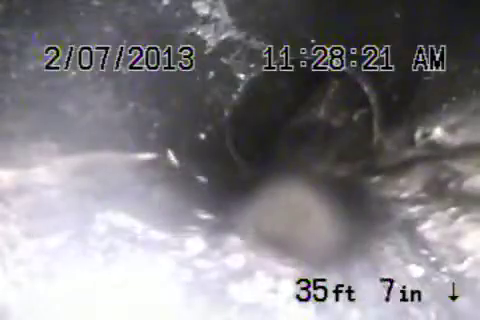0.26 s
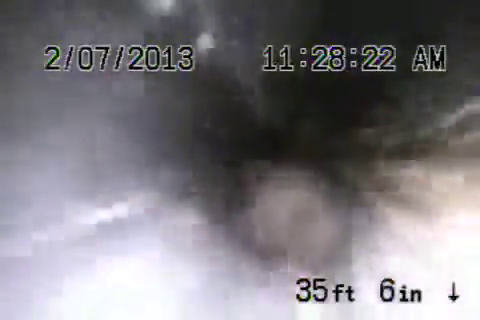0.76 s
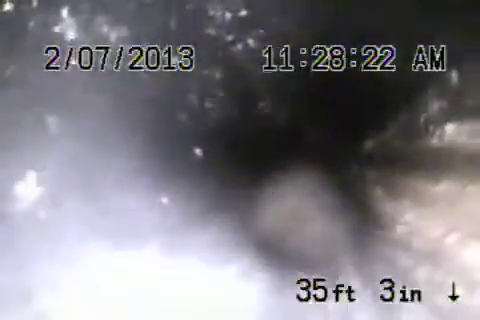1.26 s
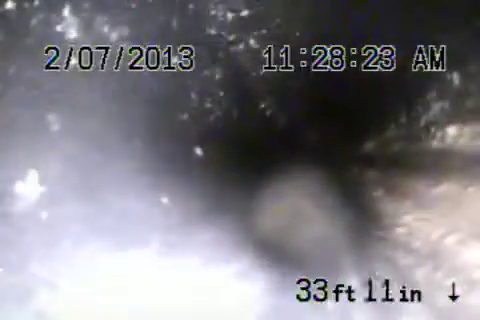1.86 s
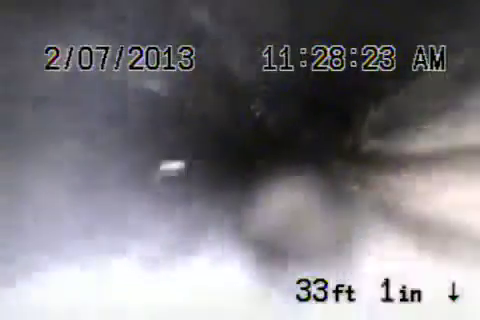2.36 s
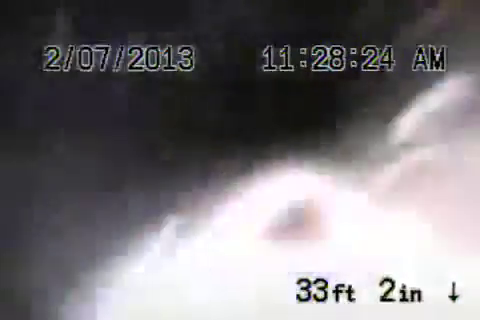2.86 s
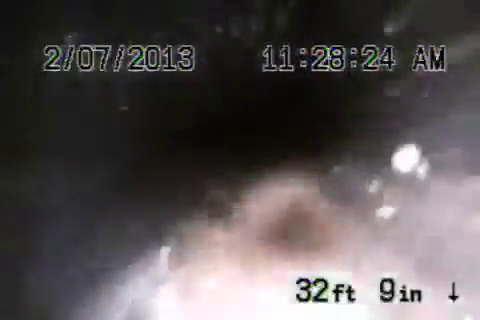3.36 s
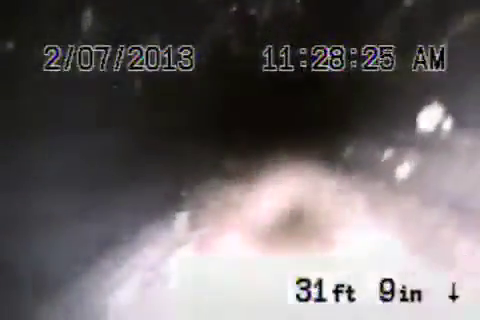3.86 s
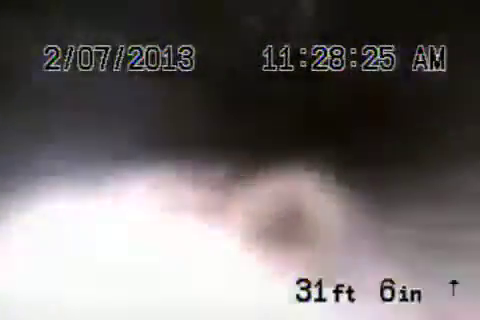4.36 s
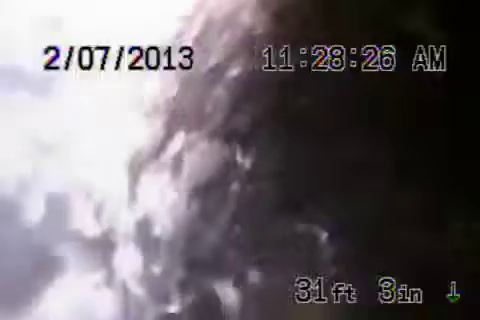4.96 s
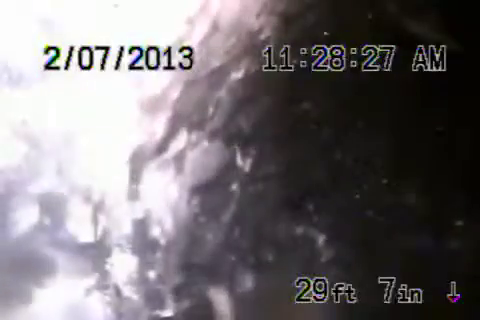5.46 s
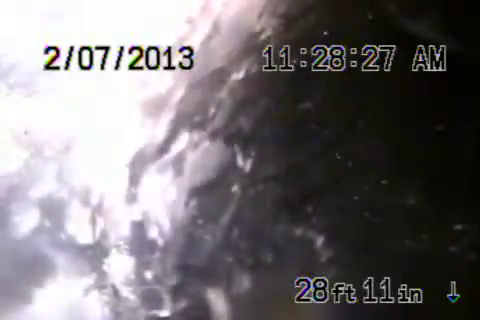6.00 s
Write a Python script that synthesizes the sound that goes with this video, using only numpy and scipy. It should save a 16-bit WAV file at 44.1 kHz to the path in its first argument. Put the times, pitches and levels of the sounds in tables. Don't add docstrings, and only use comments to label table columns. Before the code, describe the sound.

Dull thuds and rattling knocks of a cable being pulled from a pipe, with light taps, a steady low hum and soft preamp hiss.

```python
import sys
import numpy as np
from scipy import signal
from scipy.fft import rfft, irfft
from scipy.io import wavfile
from scipy.ndimage import uniform_filter1d

SR = 44100
rng = np.random.default_rng(int(sys.argv[2]) if len(sys.argv) > 2 else 0)


def gain_from_db(level_db):
    decades = np.asarray(level_db, float) / 20
    return 10 ** decades


def transcribe(u):
    v = np.clip(np.atleast_2d(u).T, -1, 1)
    q = np.round(v * 32767).astype(np.int16)
    wavfile.write(sys.argv[1], SR, q)


N = 274872

# frequency in Hz, level in dB, t60 in s.
BODY_MODES = [(219, 1, .16), (328, 4, .2), (350, -3, .14), (412, 2, .16), (470, -2, .14), (530, -1, .14),
              (568, -2, .15), (597, 0, .18), (646, -3, .15), (724, -4, .14), (850, -13, .1),
              (940, -16, .09), (1061, -15, .09), (1246, -13, .08), (1384, -10, .08), (1603, -5, .09),
              (1789, -4, .08)]


def evened(x):
    return x / np.sqrt(np.mean(x ** 2) + 1e-20)


def read(points, hz):
    f, value = np.transpose(points)
    return np.interp(np.log(hz + 1), np.log(f + 1), value)


def add(mix, s, sound):
    part = mix[round(s * SR):][:len(sound)]
    part += sound[:len(part)]


def ring(x, hz, width):
    pole = np.exp((2j * np.pi * hz - np.pi * width) / SR)
    return 2 * signal.lfilter([1 - abs(pole)], [1, -pole], x).real


def colour(x, spectrum):
    n = x.shape[-1]
    gain = gain_from_db(read(spectrum, np.fft.rfftfreq(n, 1 / SR)))
    return irfft(rfft(x) * gain, n)


def blow(t, rise, t60):
    rise, t60 = max(rise, .001), max(t60, .02)
    return np.minimum(t / rise, 1) * gain_from_db(-60 * np.maximum(t - rise, 0) / t60)


def grit(shape, spread_db):
    wander = uniform_filter1d(rng.standard_normal(shape), size=88) * np.sqrt(88)
    impacts = gain_from_db(spread_db * wander) * rng.standard_normal(shape)
    return signal.sosfilt(signal.butter(3, 1100, fs=SR, output="sos"), impacts)


def strokes(rows, rise_db_s, rest_db):
    t = np.arange(0, N / SR + .002, .001)
    power = gain_from_db(2 * rest_db)
    for s, db, t60 in rows:
        below_top = np.where(t < s, rise_db_s * (s - t), 60 * (t - s) / max(t60, .1))
        power = power + gain_from_db(2 * (db - below_top))
    return np.interp(np.arange(N) / SR, t, np.sqrt(power))


def floor():
    # frequency in Hz, density in dB per Hz.
    floor_spectrum = [(28, -24), (48, -5.5), (154, -4), (187, -11), (232, -21.5), (342, -30.5),
                      (530, -27.5), (598, -26), (881, -41), (1740, -36), (2220, -39), (2760, -40.5),
                      (7820, -41.5), (10700, -40), (15800, -44.5)]
    # centre in Hz, width in Hz, level in dB.
    whine_band = (2280, 480, -68.5)
    hiss = colour(rng.standard_normal(N), floor_spectrum)
    top = signal.sosfilt(signal.butter(4, 3000, "high", fs=SR, output="sos"), hiss)
    hz, width, whine_db = whine_band
    whine = evened(ring(ring(rng.standard_normal(N), hz, width), hz, width))
    flicker_db = evened(uniform_filter1d(rng.standard_normal(N), size=1200))
    cycle = np.arange(N) / SR * 29.97 % 1
    unsteady = gain_from_db(flicker_db + 3 * np.exp(-cycle / .1))
    return unsteady * (gain_from_db(-58.5) * hiss / np.std(top) + gain_from_db(whine_db) * whine)


def hum():
    # frequency in Hz, width in Hz, level in dB.
    room_modes = [(65.2, 4.8, 3.5), (117.9, 12.5, 4), (146, 19, -8), (167, 8.5, -5.5), (183.5, 17, -14.5)]
    # time of the top in s, level in dB, t60 in s.
    swells = [(0.01, -40, 1.7), (.45, -30.5, 3.2), (1.36, -36, 8.1), (2.2, -32, 6), (2.62, -33.5, 7.2),
              (4.3, -30.5, 2.3), (5.1, -32, 2.4), (5.85, -35, 4.2)]
    noise = rng.standard_normal((len(room_modes), N))
    tone = np.zeros(N)
    for x, (hz, width, db) in zip(noise, room_modes):
        narrow = ring(ring(x, hz, width), hz, 6.8 * width)
        tone += gain_from_db(db) * evened(narrow)
    return gain_from_db(-1.43) * strokes(swells, rise_db_s=39, rest_db=-44) * evened(tone)


def pushes():
    # time after the start in s, pressure, width in s.
    yank_lobes = [(-.1, .04, .06), (0, -.4, .022), (.037, .3, .014), (.09, .52, .017), (.15, -.11, .035),
                  (.232, .08, .016), (.27, -.07, .025)]
    recoil_lobes = [(-.08, .13, .04), (-.035, .17, .016), (0, -.3, .014), (.047, -.29, .017),
                    (.105, .17, .018), (.146, .06, .012), (.228, .06, .014), (.27, .05, .012),
                    (.3, -.05, .014)]
    slack_lobes = [(-.2, 0.033, 0.029), (-.09, -0.051, 0.067), (0, 0.087, 0.042), (.05, 0.051, 0.03),
                   (.105, -.08, .025), (.255, -0.038, 0.019)]
    # start in s, strength.
    yank_plays = [
        (.148, .79),
        (2.045, 1.01),
    ]
    recoil_plays = [
        (.588, .85),
        (2.501, 1.01),
        (4.354, .66),
    ]
    slack_plays = [
        (3.924, 1.01),
        (6.24, .6),
    ]
    t = np.arange(N) / SR
    sway_spectrum = [(3, -20), (8, -4), (16, 0), (23, 0), (28, -16), (45, -60)]  # (Hz, dB)
    out = gain_from_db(-38) * evened(colour(rng.standard_normal(N), sway_spectrum))
    gestures = ((yank_lobes, yank_plays), (recoil_lobes, recoil_plays), (slack_lobes, slack_plays))
    for lobes, plays in gestures:
        for s, strength in plays:
            for at, pressure, width in lobes:
                out += strength * pressure * np.exp(-((t - s - at) / width) ** 2)
    return out


def drag():
    # time of the top in s, level in dB, t60 in s.
    slides = [(0.01, -50.5, 1.2), (.375, -15.5, 0.34), (.56, -40.5, 8.8), (1.1, -50, 0.76),
              (1.54, -39, 0.85), (1.94, -38, 1.2), (2.19, -36, 4), (2.415, -26, 1.24), (2.92, -40.5, 3.7),
              (3.12, -37.5, 0.71), (3.4, -52, 2.5), (4.3, -44, 4.3), (4.41, -39.5, 2), (4.85, -44.5, 5.9),
              (5.1, -48.5, 1.3), (5.5, -57, 6)]
    rub = grit(N, spread_db=2.5)
    murmur = sum(gain_from_db(db) * ring(rub, hz, 4 / t60) for hz, db, t60 in BODY_MODES[:13])
    return gain_from_db(-8.0) * strokes(slides, rise_db_s=700, rest_db=-71.5) * evened(murmur)


def clunks():
    # frequency in Hz, rise in s.
    housing_modes = [
        (69, 0.026),
        (113.5, 0.018),
        (148, 0.0077),
    ]
    # start in s, peak in dB, t60 in s.
    thuds = [
        [(0.358, -27, 0.25), (1.394, -27, 0.34), (2.119, -30.5, .32), (2.424, -20, 0.2), (3.399, -36, 0.43),
         (4.048, -34.5, 0.3), (4.309, -27.5, 0.63), (5.048, -35, .4), (5.858, -25.5, 0.48),
         (6.118, -29.5, 0.46)],
        [(0.355, -20, 0.22), (0.59, -25, 0.33), (1.036, -28.5, 0.88), (1.394, -26.5, .52), (1.563, -24.5, 0.22),
         (2.113, -24, 0.22), (2.39, -24.5, .51), (2.605, -34, 0.16), (2.772, -32, 0.59), (2.96, -25, 0.68),
         (3.19, -35, 0.47), (4.19, -27, 0.44), (5.04, -21.5, 0.22), (5.0575, -16.5, 0.22), (5.787, -22, 0.23)],
        [(0.357, -15.5, 0.47), (0.48, -30.5, 0.45), (2.123, -22, 0.29), (2.389, -21, 0.15), (2.47, -21.5, 0.23),
         (2.603, -30.5, 0.23), (3.068, -28.5, 0.74), (3.2, -23.5, 0.4), (4.185, -22.5, 0.57),
         (4.317, -28, 0.21), (5.125, -36, .38)],
    ]
    t, out = np.arange(SR // 2) / SR, np.zeros(N)
    for (hz, rise), rows in zip(housing_modes, thuds):
        for s, db, t60 in rows:
            noise = rng.standard_normal(len(t))
            wobble = 0.22 * evened(ring(noise, hz, 14.5))
            tone = np.sin(2 * np.pi * hz * t) + wobble
            add(out, s, gain_from_db(db - 1.5) * tone * blow(t, rise, t60))
    return out


def hits():
    knock_rises = [
        0.0058,
        0.0091,
        0.017,
    ]
    # start in s, peak in dB, bright clatter in dB,
    # centre of the ring in octaves above 250 Hz, rattle t60 in s.
    hard_knocks = [
        [(1.029, -32, -49, 1.2, 0.25), (1.481, -32, -57, 1.4, 0.23), (3.063, -25, -39, 1.74, 0.088),
         (4.178, -20.5, -34, 0.97, 0.34)],
        [(0.35, -13.5, -24.5, 0.67, 0.28), (1.872, -34.5, -56.5, 1.17, 0.69), (2.094, -20.5, -34.5, 1.27, 0.3),
         (2.469, -28.5, -39, 1.3, 0.47)],
        [(2.384, -18.5, -27, 1.62, 0.4), (2.569, -30, -42, 1.13, 0.21), (3.273, -38, -51, 1.5, 0.18),
         (5.03, -27, -49, 1.24, 0.49), (5.056, -23.5, -32, 0.59, 0.28), (5.781, -33, -44.5, 0.87, 0.27)],
    ]
    # start in s, peak in dB, centre of the ring in octaves above 250 Hz.
    light_taps = [(0.116, -53, 1.6), (0.548, -33, 0.78), (0.838, -48, 0.97), (0.867, -42.5, 0.98),
                  (0.985, -46, 1.4), (1.198, -44, 0.47), (1.395, -44, 0.26), (1.638, -40, 0.36),
                  (1.762, -48, 0.67), (1.914, -37, 1.5), (2.23, -31.5, 0.82), (2.322, -33, 1.3),
                  (2.665, -44, 0.24), (2.783, -42, 0.73), (2.926, -41, 1.2), (3.096, -34.5, 1.1),
                  (3.907, -49, 2.3), (4.299, -39, 0.61), (4.494, -40, 0.98), (4.539, -47.5, 2.2),
                  (4.72, -40, 0.67), (4.802, -40, 0.22), (5.199, -46, 0.27), (5.579, -50, 1.5)]
    found = []
    for rise, rows in zip(knock_rises, hard_knocks):
        for s, db, bright_db, place, t60 in rows:
            found.append((s, db, bright_db, place, rise, t60))
    for s, db, place in light_taps:
        bright_db = -53 + 0.38 * (db + 36)
        found.append((s, db, bright_db, place, .011, 0.22))
    return found


def clatter(noise, t60, tilt_db):
    # frequency in Hz, clatter t60 as a factor on the rattle's.
    fade_factors = [(700, 1.32), (2000, 0.94), (4000, 0.77), (8000, 0.36)]
    hz, t, z = signal.stft(noise, SR, nperseg=128)
    tilt = tilt_db * np.log2(np.maximum(hz, 700) / 1600)
    band_t60 = max(t60, .03) * read(fade_factors, hz)
    z = z * gain_from_db(tilt[:, None] - 60 * t / band_t60[:, None])
    return signal.istft(z, SR, nperseg=128)[1][:len(noise)]


def knocks():
    # frequency in Hz, density in dB per Hz.
    clatter_spectrum = [(500, 14), (800, -11.5), (1200, -4.5), (1650, -1.5), (2200, -11), (3000, -16),
                        (4500, -28), (7000, -37.5), (11000, -59), (16000, -64)]
    strikes = hits()
    t, out = np.arange(SR * 2 // 5) / SR, np.zeros(N)
    rattle = evened(grit((len(strikes), len(t)), spread_db=3.5))
    noise = evened(colour(rng.standard_normal(rattle.shape), clatter_spectrum))
    tap = 2 * np.exp(-((t - .001) / .0003) ** 2)
    for (s, db, bright_db, place, rise, t60), shake, crack in zip(strikes, rattle, noise):
        shake = shake * blow(t, rise, .75 * t60) + min(.007 / rise, 1) * tap
        body = np.zeros(len(t))
        for hz, mode_db, mode_t60 in BODY_MODES:
            octaves_off = np.log2(hz / 250) - np.clip(place, .3, 1.7)
            near_db = mode_db - np.minimum(14 * octaves_off ** 2, 20)
            body += gain_from_db(near_db) * ring(shake, hz, 1.8 / mode_t60)
        loud = np.sqrt(uniform_filter1d(body ** 2, size=400).max())
        above_hiss = np.sqrt(max(gain_from_db(2 * bright_db) - gain_from_db(2 * -59), 0))
        hardness = np.clip(bright_db - db + 18, -10, 10)
        crack = clatter(crack, t60, 0.76 * hardness)
        crack = crack * np.minimum(t / (1.9 * rise), 1) ** 0.29
        add(out, s - .001, gain_from_db(db - 4) * body / loud + 3 * above_hiss * crack)
    return out


def scene():
    return (floor() + hum() + pushes() + drag() + clunks() + knocks())[None]


def low_pass(x):
    return signal.sosfilt(signal.butter(12, 16170, fs=SR, output="sos"), x)


def record(dry):
    free, full = .08, .48
    first_lost_hz, lost_above_hz = 8000, 3200
    ahead_s = .004
    hz, t, z = signal.stft(dry, SR, nperseg=256)
    pressure = abs(uniform_filter1d(dry[0], size=500))
    pressure = np.interp(t + ahead_s, np.arange(N) / SR, pressure)
    strain = np.clip((pressure - free) / (full - free), 0, 1)
    luck = rng.random((len(t) // 6 + 1, len(hz) // 3))
    luck = np.repeat(np.repeat(luck, 3, axis=1), 6, axis=0)[:len(t)].T
    edge_hz = first_lost_hz + (lost_above_hz - first_lost_hz) * np.sqrt(strain)
    lost = (hz[:, None] > edge_hz) & (luck < strain)
    mix = signal.istft(z * np.where(lost, .08, 1), SR, nperseg=256)[1][:, :N]
    return low_pass(mix)


dry = scene()
out = record(dry)
transcribe(out)
```